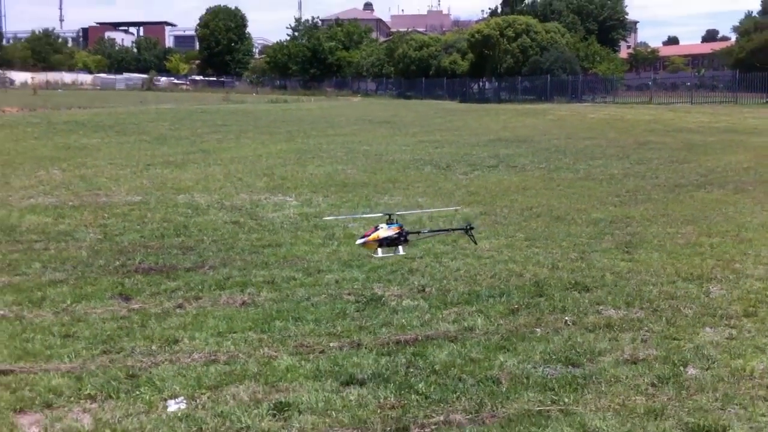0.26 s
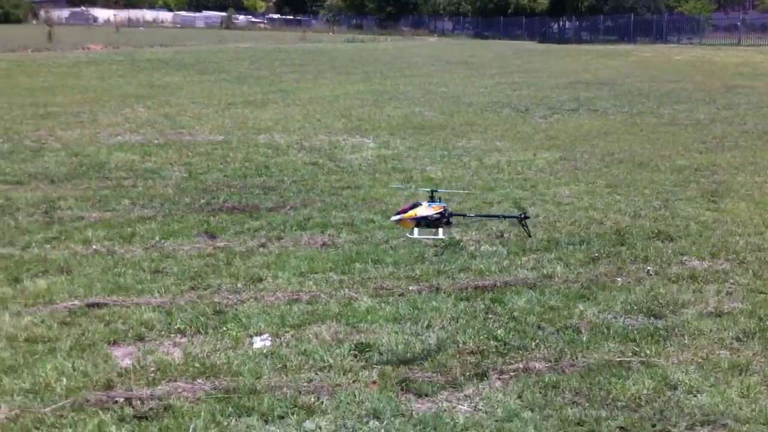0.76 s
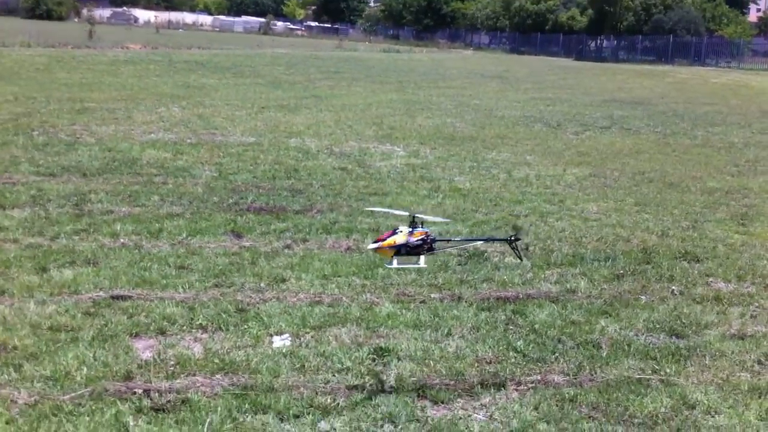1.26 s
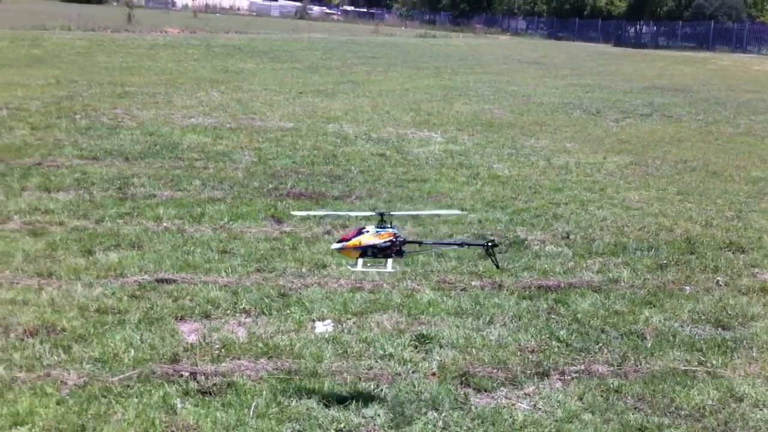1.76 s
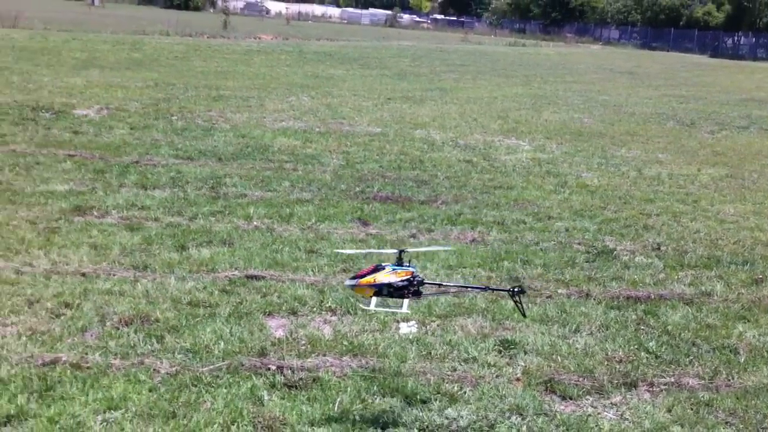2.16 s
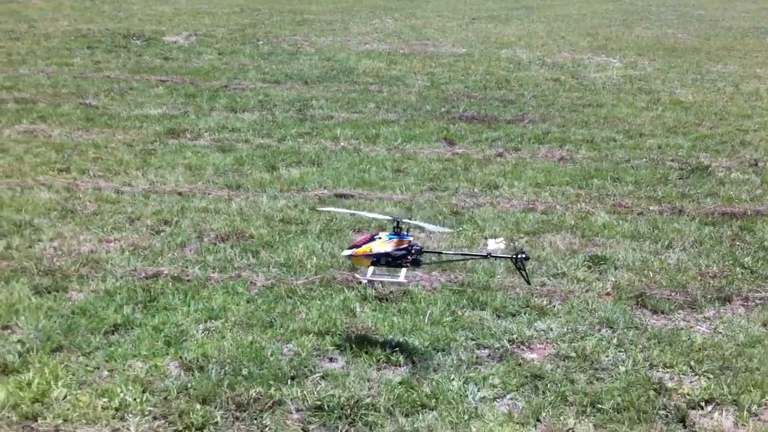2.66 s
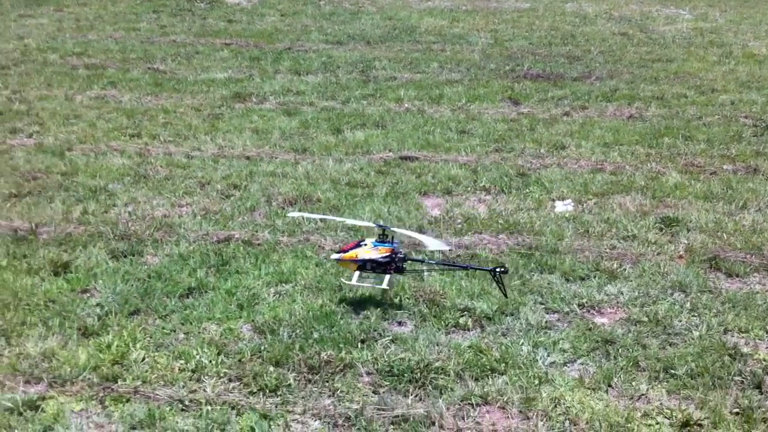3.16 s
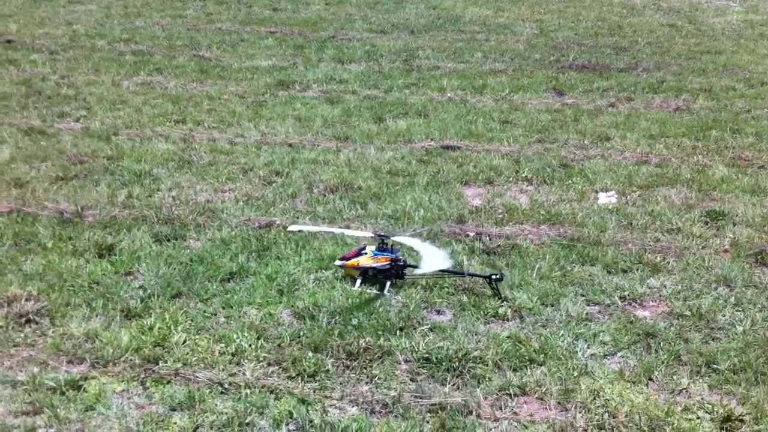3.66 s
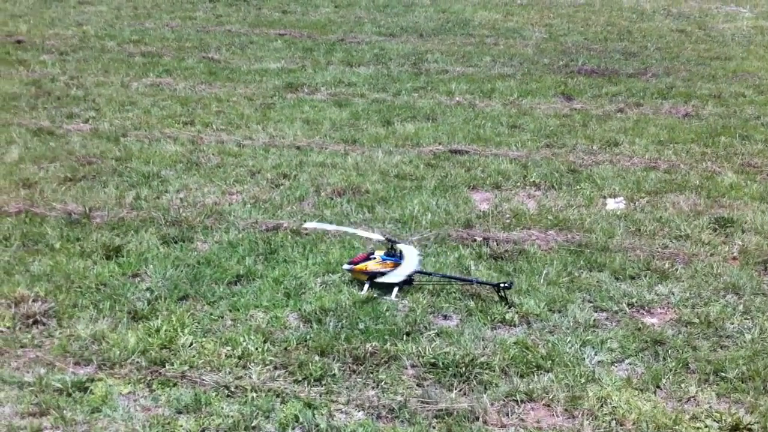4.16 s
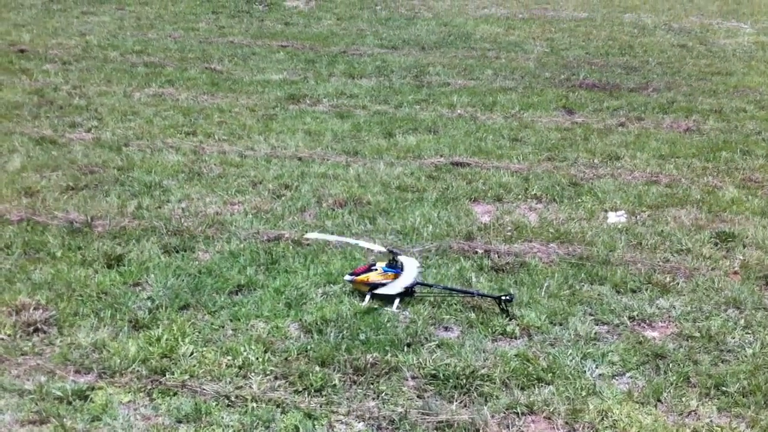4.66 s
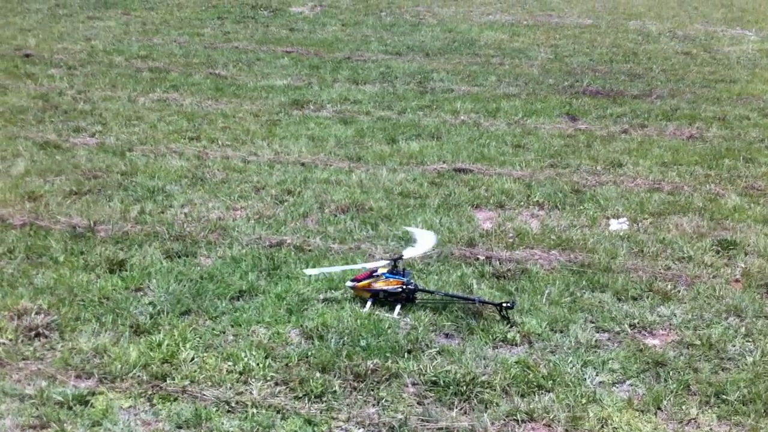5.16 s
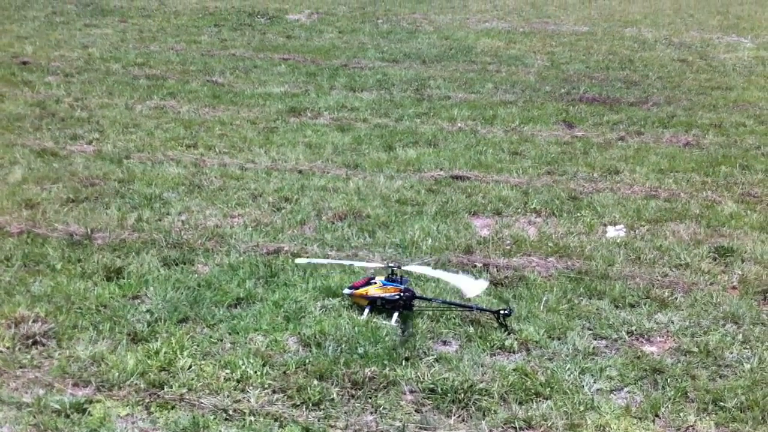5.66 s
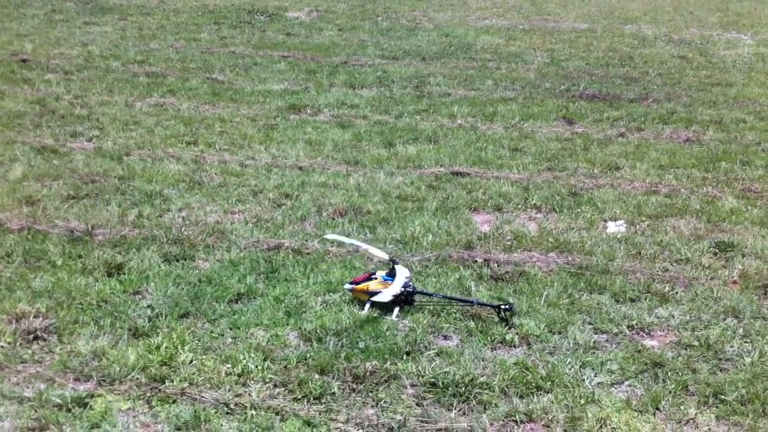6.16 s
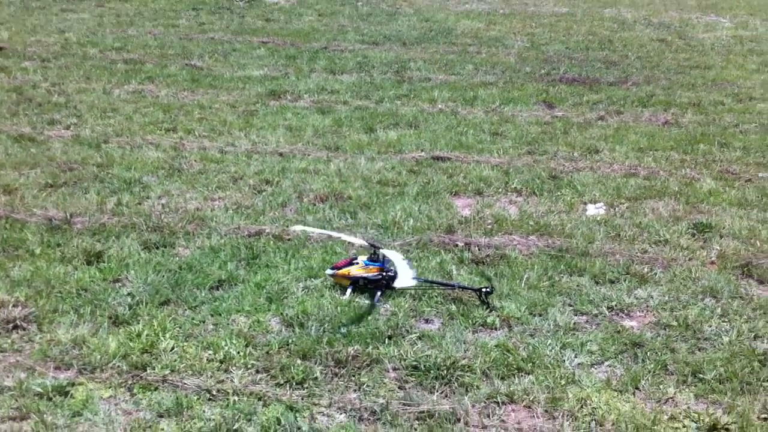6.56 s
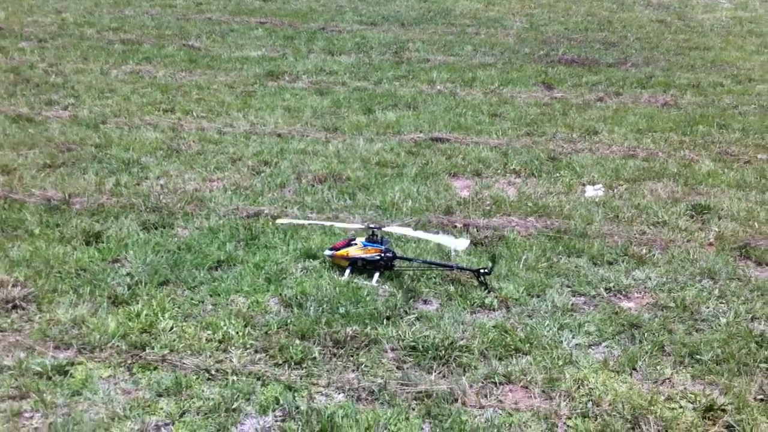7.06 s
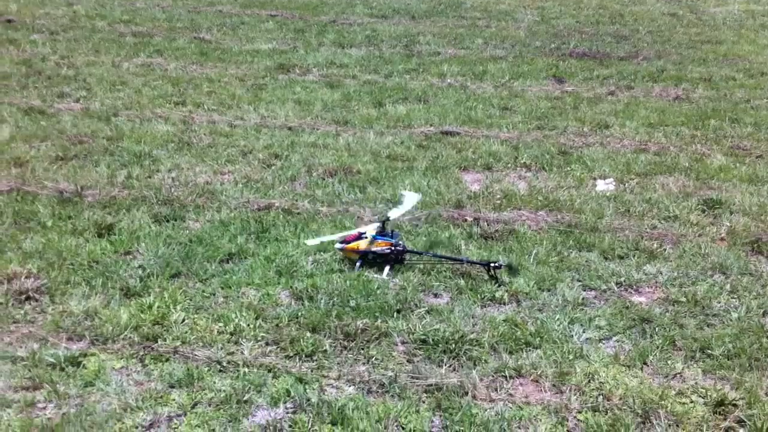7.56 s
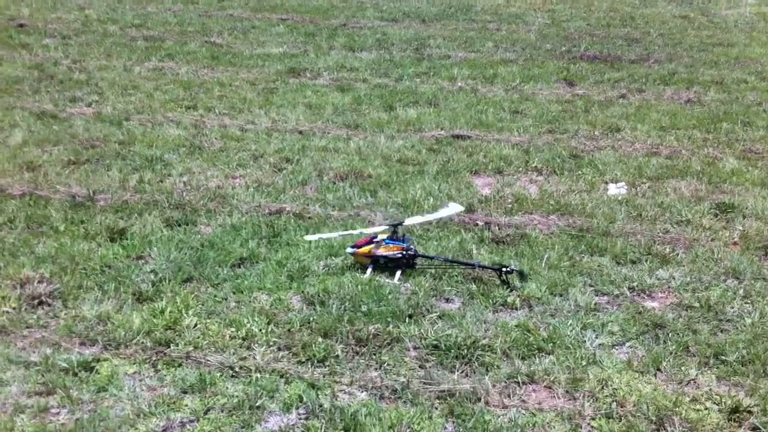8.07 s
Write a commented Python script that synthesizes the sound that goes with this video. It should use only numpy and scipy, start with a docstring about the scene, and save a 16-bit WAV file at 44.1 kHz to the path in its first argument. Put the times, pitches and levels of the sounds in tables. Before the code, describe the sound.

Model helicopter hum, rattle and high singing gears drift nearer outdoors, grass crackles at landing, then the motor cuts and a falling whine slides away.

```python
"""A small electric model helicopter over a grass field, its hum, chop and gear whine in step with one head
speed. First it hovers and drifts closer: blade-pass tones, chopped noise, rattling teeth and singing mesh
lines. A squeak comes next, then crackling noise as the skids brush the grass at touchdown. At the throttle cut
the whine lets go and the rotors run down through a wake growl, with a brief falling gear tone and more squeaks.
Alongside, a faster-falling tone of the coasting drive sweeps through the frame's resonances."""
import sys
import numpy as np
from scipy import signal
from scipy.fft import rfft, irfft, next_fast_len
from scipy.io import wavfile
from scipy.ndimage import uniform_filter1d

SR = 44100
rng = np.random.default_rng(int(sys.argv[2]) if len(sys.argv) > 2 else 0)


def wav_out(sig):
    """Save sig, one row per channel (or a flat mono array), as 16-bit PCM at SR to the path in sys.argv[1]."""
    wavfile.write(sys.argv[1], SR, np.round(np.clip(np.atleast_2d(sig).T, -1, 1) * 32767).astype(np.int16))


N = 366912
TIME = np.arange(N) / SR
CUT_S = 4.99  # the throttle is cut
TAIL_RATIO = 8.16  # tail blade passes per main rotor turn
# source levels hold at this head speed and at the landing spot
FULL_SPEED_HZ = 46
# level change per tenfold change in speed
BLADE_SLOPE_DB, AIR_SLOPE_DB, WASH_SLOPE_DB, DRIVE_SLOPE_DB = 44.5, 47.5, 33, 45


def undb(db):
    """Decibels to gain."""
    return 10 ** (np.asarray(db) / 20)


def curves(table):
    """The columns of a table after its times, joined by straight lines."""
    times, *columns = np.transpose(table)
    return [np.interp(TIME, times, column) for column in columns]


def unit(x):
    """Scale to rms 1."""
    return x / np.sqrt(np.mean(x ** 2))


def noise():
    """White noise."""
    return rng.standard_normal(N)


def walk(rate):
    """Smooth random wander of rms 1, turning about `rate` times a second."""
    hold = max(int(SR / rate), 2)
    steps = np.repeat(rng.standard_normal(N // hold + 1), hold)
    smooth = uniform_filter1d(uniform_filter1d(steps, hold), hold)
    return unit(smooth[:N])


def through(x, points):
    """Filter x by a response of (pitch_hz, level_db) points, silent beyond its ends."""
    hz, db = np.transpose(points)
    size = next_fast_len(N + 4096)
    f = np.maximum(np.arange(size // 2 + 1) * SR / size, 1)
    gain = undb(np.interp(np.log(f), np.log(hz), db, left=-np.inf, right=-np.inf))
    return irfft(rfft(x, size) * gain, size)[:N]


def colour(x, points):
    """Filter x by (pitch_hz, level_db) points, then scale to rms 1."""
    return unit(through(x, points))


def sine(cycles):
    """A tone of rms 1 along a running phase in cycles, from a random start."""
    return np.sqrt(2) * np.sin(2 * np.pi * (cycles + rng.random()))


def throb(cycles, depth):
    """Gain that swells once a cycle, with mean power 1."""
    return unit(1 + depth * np.cos(2 * np.pi * (cycles + rng.random())))


def since_cut():
    """Seconds since the throttle was cut, zero before."""
    return np.maximum(TIME - CUT_S, 0)


def run_down(start_hz, drag, friction):
    """Speed of a freewheeling shaft that loses drag * speed ** 2 + friction Hz every second."""
    knee = np.sqrt(friction / drag)
    return knee * np.tan(np.arctan(start_hz / knee) - drag * knee * since_cut())


# main rotor speed held by the governor until the cut: [start_s, speed_hz]
HEAD_SPEED = [(0, 45.75), (.3, 45.64), (.75, 45.85), (1.5, 45.41), (2.15, 45.71), (2.75, 45.78),
              (3.45, 45.65), (3.95, 46.0), (4.12, 45.97), (4.3, 46.51), (4.7, 47.1), (4.88, 46.78),
              (4.99, 46.4)]
ROTOR_DRAG, ROTOR_FRICTION_HZ_PER_S = .00582, 2.28


def head_speed():
    """Governed rotor speed in Hz, then a run-down under air drag (speed squared) and steady friction."""
    governed_hz, = curves(HEAD_SPEED)
    falling_hz = run_down(governed_hz[-1], ROTOR_DRAG, ROTOR_FRICTION_HZ_PER_S)
    return np.where(TIME < CUT_S, governed_hz, falling_hz)


# the helicopter drifts closer: [start_s, distance_m]
DISTANCE = [(0, 6.2), (1.3, 5.84), (2.4, 4.3), (3.0, 4.26)]


def approach():
    """Gain inverse to the distance, 1 at the landing spot."""
    distance_m, = curves(DISTANCE)
    return distance_m[-1] / distance_m


# tint of the outdoor floor: [pitch_hz, level_db]
FIELD_TINT = [(20, -17), (50, -21), (80, -34), (130, 1), (220, 5), (450, -4), (1500, -16), (5400, -23),
              (8000, -30), (16000, -34)]
FIELD_DB = -58.5


def field():
    """A faint outdoor floor of tinted noise, its level gently wandering."""
    return undb(FIELD_DB + 1.0 * walk(3.32)) * colour(noise(), FIELD_TINT)


def rotor(cycles, harmonics_db, flutter_db, flutter_rate, odd_db=0):
    """Blade-pass harmonics; gusty inflow shakes their levels one by one."""
    out = 0
    for k, db in enumerate(harmonics_db, 1):
        level_db = db + k % 2 * odd_db + flutter_db * walk(flutter_rate)
        out = out + undb(level_db) * sine(k * cycles)
    return out


# thrust hum, fading as the weight comes off, and slap: [start_s, hum_db, slap_db]
MAIN_LEVELS = [(0, -45.5, -51), (1.2, -42, -48.5), (1.9, -44, -48), (2.6, -40.5, -43.5), (3.4, -46.5, -45),
               (3.95, -46, -48.5), (4.5, -46.5, -43.3), (5.25, -48.5, -45), (5.9, -66, -46.5),
               (7.0, -64, -50.5)]
# main rotor mix, one entry per blade-pass multiple from 1 up: [level_db]
HUM_HARMONICS = [-18.5, -2]
SLAP_HARMONICS = [-28, -25, -4.5, -8, -5.5, -8, -6, -6, -7.5, -8, -13, -10.5, -14, -14.5, -18.5, -14, -18]
# tail rotor correcting the heading: [start_s, level_db, odd_harmonics_db, second_harmonic_db]
TAIL_LEVELS = [(0, -41, -6, -3.5), (1.0, -38, -13.5, -3.5), (1.85, -41, -17, -5.5), (2.2, -39.5, -9.5, 7.5),
               (2.8, -47.5, 7, 0.5), (3.55, -46.5, 3, 2.5), (3.9, -42.5, 1, 8), (4.4, -42.5, 3.5, 1),
               (5.6, -40, -0.5, -1), (7.0, -42.5, 4.5, -5), (8.32, -39.5, -3.5, -3)]
# tail rotor mix before the odd and second trims, per blade-pass multiple: [level_db]
TAIL_HARMONICS = [-5, -5.5, -7.5, -7.5, -9, -9, -12, -10, -9, -10, -11, -14, -15, -15, -16, -17, -17, -18]
# blade tones meeting their bounce off the ground, with a notch near 480 Hz: [pitch_hz, level_db]
GROUND_BOUNCE = [(20, -19), (90, -2), (190, -7), (380, -5.5), (470, -9), (560, -5), (740, -3), (1100, -2),
                 (1500, -1.5), (2200, -5), (2750, 5.5), (3250, -8.5), (4200, 0), (5400, -1), (7000, 8)]


def blades(turns, speed):
    """The two-blade main rotor hums and slaps; the geared-up tail rotor buzzes above it."""
    hum_db, slap_db = curves(MAIN_LEVELS)
    tail_db, odd_db, second_db = curves(TAIL_LEVELS)
    tail_harmonics_db = [TAIL_HARMONICS[0], TAIL_HARMONICS[1] + second_db, *TAIL_HARMONICS[2:]]
    hum = rotor(2 * turns, HUM_HARMONICS, flutter_db=2.8, flutter_rate=12)
    slap = rotor(2 * turns + .005 * walk(12), SLAP_HARMONICS, flutter_db=2.6, flutter_rate=10)
    # the tail runs on a stretchy belt, so its phase wanders
    tail_cycles = TAIL_RATIO * turns + .025 * walk(9) + .01 * walk(70)
    tail = rotor(tail_cycles, tail_harmonics_db, flutter_db=2.6, flutter_rate=16, odd_db=odd_db)
    # it cuts through the wake of each main blade
    tail = tail * throb(2 * turns, depth=.25)
    tones = undb(hum_db) * hum + undb(slap_db) * slap + undb(tail_db) * tail
    return through(tones, GROUND_BOUNCE) * undb(BLADE_SLOPE_DB * np.log10(speed))


# blade swish and tip vortex hiss over time: [start_s, level_db]
SWISH_LEVEL = [(0, -49.5), (1.0, -42.5), (1.3, -47.5), (2.4, -43), (3.05, -43.5), (3.4, -46), (3.9, -44.5),
               (4.15, -48.5), (5.25, -40.5), (6.2, -42.5), (8.32, -38.5)]
VORTEX_LEVEL = [(0, -41), (.3, -37.3), (.8, -34.5), (1.35, -39), (1.9, -38.5), (2.15, -33), (2.65, -34.5),
                (3.3, -37.5), (3.7, -41.5), (4.12, -46), (4.3, -41), (5.3, -40.5), (7.2, -43), (8.1, -36.5)]
# tints of low wash, swish (and growl), vortex hiss: [pitch_hz, level_db]
WASH_TINT = [(20, -18), (45, -23), (80, -11.5), (130, -2.5), (220, 0.5), (330, -2.5), (480, -7.5),
             (700, -22)]
SWISH_TINT = [(350, -62), (550, -5.5), (720, 0), (900, -1.5), (1200, -4.5), (1500, -6), (2000, -37)]
VORTEX_TINT = [(1000, -18), (1500, 2.5), (1900, 4.5), (2250, 9), (2550, 5.5), (3100, 1), (3600, -4.5),
               (5000, -9)]
WASH_DB = -51
# the growl swells and fades around WAKE_S
WAKE_S, WAKE_LENGTH_S, WAKE_DB = 5.45, .6, -41.5


def air(turns, speed):
    """Low wash under turbulence chopped at the blade-pass rates; after the cut the rotor's own wake growls."""
    swish_db, = curves(SWISH_LEVEL)
    vortex_db, = curves(VORTEX_LEVEL)
    wash = colour(noise(), WASH_TINT) * undb(WASH_DB + WASH_SLOPE_DB * np.log10(speed))
    swish_chop = throb(2 * turns, depth=0.43) * throb(TAIL_RATIO * turns, depth=0.5)
    swish = colour(noise() * swish_chop, SWISH_TINT)
    vortex_chop = throb(2 * turns, depth=0.26) * throb(TAIL_RATIO * turns, depth=0.5)
    vortex = colour(noise() * vortex_chop, VORTEX_TINT)
    growl = colour(rotor(2 * turns, np.zeros(15), flutter_db=3, flutter_rate=10), SWISH_TINT)
    in_wake = undb(WAKE_DB) * np.exp(-((TIME - WAKE_S) / WAKE_LENGTH_S) ** 2)
    gusts_db = 1.0 * walk(35)
    chop = undb(swish_db + gusts_db) * swish + undb(vortex_db + gusts_db) * vortex + in_wake * growl
    return wash + chop * undb(AIR_SLOPE_DB * np.log10(speed))


def teeth(turns, count=340):
    """Tooth errors: one random pattern that comes back every turn and is much alike every half turn."""
    orders = np.arange(count)
    strength = np.where(orders % 2, .45, 1) * (orders > 0)
    pattern = irfft(strength * np.exp(2j * np.pi * rng.random(count)), 2 ** 14)
    position = (turns % 1 * len(pattern)).astype(int)
    return unit(pattern[position])


# drive train noises: [start_s, rattle_db, belt_hiss_db, tooth_sizzle_db]
DRIVE_LEVELS = [(0, -34, -44, -36.5), (.45, -32.5, -38.5, -34.7), (.65, -32.5, -44, -36.5),
                (.86, -34, -36.3, -40), (1.3, -37.5, -37, -41.3), (2.5, -34.5, -36, -40.6),
                (3.35, -36, -37.5, -42), (3.85, -35.5, -35, -38.5), (4.95, -36.5, -37.5, -40.2),
                (5.45, -34, -35, -34.5), (6.85, -33, -34, -35), (7.05, -34.5, -37.5, -37),
                (7.7, -33.5, -37, -37.5), (8.2, -29.5, -38, -38.7)]
# the frame's ring: [start_s, level_db]
FRAME_LEVEL = [(0, -54), (.65, -50), (.92, -36.5), (1.9, -52), (2.6, -45.5), (3.3, -45), (3.6, -37),
               (4.1, -41.5), (4.25, -33.5), (4.43, -40.5), (6.55, -37), (7.1, -39.5), (8.32, -33)]
# screech around the upper whine: [start_s, level_over_sizzle_db]
SCREECH_LEVEL = [(.45, -19), (.8, 1), (1.5, 3), (3, 8.5), (4.9, 4), (5.1, 5), (5.5, -2), (6, 4), (6.6, -3)]
# tints of the drive train noises: [pitch_hz, level_db]
FRAME_TINT = [(1900, -35), (2400, -11), (2700, 8), (2950, 3), (3200, -13), (3700, -10), (4600, -4.5),
              (5350, -2), (6200, -7), (7200, -50)]
RATTLE_TINT = [(2500, -2), (3250, -27), (3450, -1.5), (3650, -13.5), (3950, -0.5), (4400, -2.5), (5400, 4),
               (6400, 2.5), (7200, -1.5), (7700, -2.5), (8600, -20)]
BELT_TINT = [(6500, -30), (7300, -30), (7800, -1.5), (8400, 4.5), (9000, 8), (9700, 7), (10500, -13.5),
             (12000, -37)]
SIZZLE_TINT = [(9500, -13.5), (10600, -6), (11200, -3.5), (12000, 1), (12800, -0.5), (14100, -1),
               (14600, -1.5), (15100, -5), (15800, -12)]
SCREECH_TINT = [(12200, -20), (13000, -5), (13500, -7), (14100, -4), (14450, -9), (14800, -14)]
# weaker lines of the uneven gears: [head_speed_multiple]
MESH_ORDERS = [50, 60, 102, 106, 122, 130, 140, 144, 158, 180, 202, 210, 288, 298, 302, 312, 318]
# their levels, before load and flutter: [level_over_rattle_db]
MESH_LEVELS = [-19, -18, -20, -18, -19, -16, -20, -20, -20, -19, -19, -18, -14, -16, -12, -18, -22]
# the gears unload at the cut: load shares (0-1) and release time
DRIVEN_LOAD, COASTING_LOAD, UNLOAD_S = 0.7, 0.31, 0.27


def drive_train(turns, speed):
    """Teeth, belt and bearings rattle the frame, more regularly under load and more loosely without it."""
    rattle_db, belt_db, sizzle_db = curves(DRIVE_LEVELS)
    frame_db, = curves(FRAME_LEVEL)
    screech_db, = curves(SCREECH_LEVEL)
    load = COASTING_LOAD + (DRIVEN_LOAD - COASTING_LOAD) * np.exp(-since_cut() / UNLOAD_S)
    regular = np.clip(.27 * load, 0, 1)
    errors = teeth(turns)
    loose = noise() * undb(0.88 * walk(900))
    contact = np.sqrt(regular) * errors + np.sqrt(1 - regular) * loose
    # the frame keeps ringing to the gear pattern even while it coasts
    ring = colour((noise() + 0.24 * errors) * throb(2 * turns, depth=0.083), FRAME_TINT)
    # the blades shake the frame as they pass
    shake = throb(turns, depth=.1) * throb(2 * turns, depth=.09) * throb(TAIL_RATIO * turns, depth=.12)
    rattle = colour(contact * shake, RATTLE_TINT) * undb(.5 * walk(25))
    belt = colour(contact * shake, BELT_TINT) * undb(0.9 * walk(25.05))
    # sliding tooth flanks hiss up high, with a screech around the upper whine
    tight = np.clip(.6 * load, 0, 1)
    scrape = np.sqrt(tight) * errors + np.sqrt(1 - tight) * noise()
    screech = colour(scrape * shake, SCREECH_TINT)
    sizzle = colour(contact * shake, SIZZLE_TINT) + undb(screech_db) * screech
    lines = 0
    for order, db in zip(MESH_ORDERS, MESH_LEVELS):
        lines = lines + undb(db + 2.2 * walk(14)) * sine(order * turns + .025 * walk(40))
    parts = undb(frame_db) * ring + undb(rattle_db) * (rattle + load * lines)
    parts = parts + undb(belt_db) * belt + undb(sizzle_db) * sizzle
    return parts * undb(DRIVE_SLOPE_DB * np.log10(speed))


# gear whine, swelling as the machine turns and tilts:
# [start_s, mesh_db, lower_sideband_db, double_mesh_db, upper_sidebands_db]
WHINE_LEVELS = [(0, -29.5, -49, -49, -54), (.3, -37.5, -51, -50, -49), (.5, -35, -50, -49, -50),
                (.62, -38.5, -44, -47, -30), (1.0, -53, -40, -44, -37), (1.35, -39, -41, -36, -39.5),
                (1.6, -46, -46, -28, -43), (1.8, -45, -47, -34, -43), (2.15, -44.5, -42, -29.5, -39),
                (2.88, -42, -49, -35, -44), (3.1, -37, -40, -25.5, -39), (3.35, -38.5, -30, -28.5, -39),
                (3.55, -55, -30, -27, -39), (3.75, -42, -35, -29, -44), (4.08, -42, -41, -34, -50),
                (4.4, -36, -23.5, -32, -55), (4.75, -36.5, -26, -31, -43), (5.0, -40.5, -31, -36, -50)]
# strongest mesh lines, one group for each level above: [head_speed_multiples]
WHINE_ORDERS = [
    [150],
    [292],
    [300],
    [308, 310],
]
WHINE_RELEASE_S = .04


def whine(turns):
    """The 150-tooth main gear sings at its mesh rate and around twice that; run-out throbs and roughens it."""
    runout = throb(turns, depth=.33) * throb(2 * turns, depth=.24)
    out = 0
    for orders, db in zip(WHINE_ORDERS, curves(WHINE_LEVELS)):
        for order in orders:
            # backlash jitters the phase, the more the higher the order
            jitter = .055 * walk(60) + .055 * walk(400)
            slip = jitter * np.sqrt(order / np.max(WHINE_ORDERS[-1]))
            flutter_db = 1.7 * walk(50) + 1.2 * walk(9)
            out = out + undb(db + flutter_db) * sine(order * turns + slip)
    return out * runout * np.exp(-since_cut() / WHINE_RELEASE_S)


# short squeaks, and at 5.26 s a brief falling gear tone: [centre_s, length_s, pitch_hz, glide_hz_per_s,
# level_db]
GLIDES = [(3.05, .035, 2740, 0, -38), (5.26, .08, 5550, -1750, -40), (6.2, .025, 14200, -3000, -45),
          (7.4, .028, 5320, -700, -47)]


def glides():
    """Brief squeaks and one short gear tone, most of them falling: gliding tones with a jittered phase under
    bell-shaped swells."""
    out = 0
    for centre_s, length_s, hz, glide, db in GLIDES:
        t = TIME - centre_s
        cycles = hz * t + glide * t ** 2 / 2 + 0.074 * walk(200)
        out = out + undb(db) * np.exp(-(t / length_s) ** 2) * sine(cycles)
    return out


# skids brushing the grass: [centre_s, length_s, level_db]
SKIDS = [(3.72, 0.067, -36.5), (3.91, 0.056, -31.5)]


def skids():
    """Dry grass crackles softly under the skids at touchdown: noise of jumpy level in bell-shaped swells."""
    touch = sum(undb(db) * np.exp(-((TIME - centre_s) / length_s) ** 2) for centre_s, length_s, db in SKIDS)
    crackle = noise() * undb(5 * walk(1500))
    return touch * colour(crackle, [(1500, -18), (4000, 1), (7000, 4), (10000, -2), (15500, -12)])


# frame resonances that the coasting tone sweeps through: [pitch_hz, width_hz, level_db]
COAST_MODES = [(7850, 500, -42), (5880, 400, -46), (5320, 280, -46), (4570, 200, -56), (4180, 300, -45.5),
               (3500, 99, -63), (2950, 187, -33), (2450, 520, -52.5)]
COAST_START_HZ, COAST_DRAG, COAST_FRICTION_HZ_PER_S = 8640, 3.782e-5, 978
COAST_ATTACK_S = .2


def coast():
    """The unpowered drive's tone falls faster than the rotors, swelling at frame resonances, rougher while fast."""
    hz = run_down(COAST_START_HZ, COAST_DRAG, COAST_FRICTION_HZ_PER_S)
    gain = sum(undb(db) / (1 + (2 * (hz - centre) / width) ** 2) for centre, width, db in COAST_MODES)
    attack = np.minimum(since_cut() / COAST_ATTACK_S, 1)  # silent until the cut
    slip = 0.056 * walk(80) * hz / hz.max()
    return attack * gain * undb(1.2 * walk(30)) * sine(np.cumsum(hz) / SR + slip)


def scene():
    """The helicopter in the open over a faint outdoor floor, the same in both channels."""
    head_hz = head_speed()
    speed = head_hz / FULL_SPEED_HZ
    # the head speed hunts very slightly
    turns = np.cumsum(head_hz) / SR + .0003 * walk(14)
    helicopter = blades(turns, speed) + air(turns, speed) + drive_train(turns, speed) + whine(turns)
    helicopter = helicopter + glides() + skids() + coast()
    mono = helicopter * approach() + field()
    return np.array([mono, mono])


TOP_HZ = 15650


def record(dry):
    """The recorder cuts the top steeply, with an elliptic low-pass."""
    return signal.sosfilt(signal.ellip(12, .2, 80, TOP_HZ, fs=SR, output="sos"), dry)


dry = scene()
out = record(dry)
wav_out(out)
```